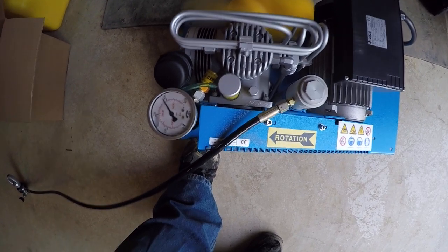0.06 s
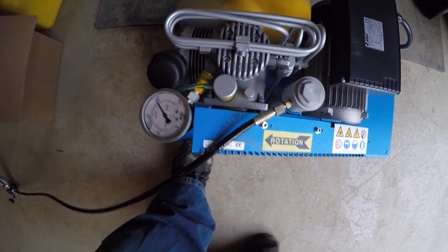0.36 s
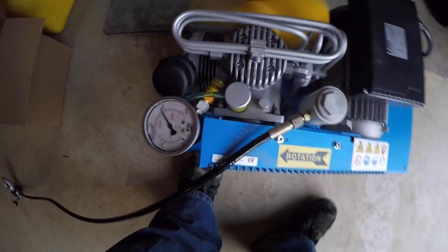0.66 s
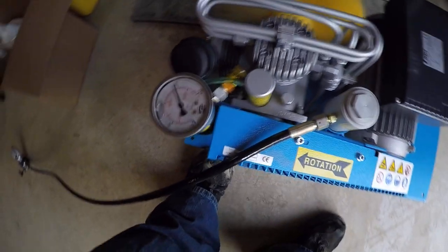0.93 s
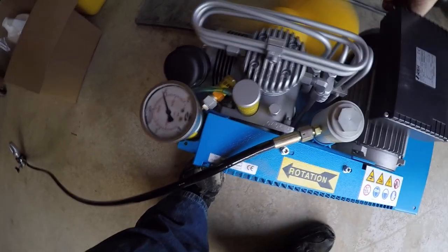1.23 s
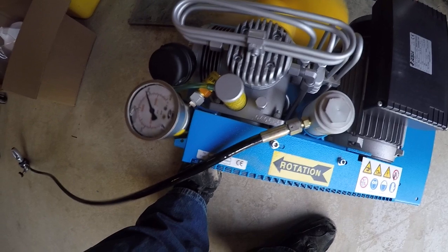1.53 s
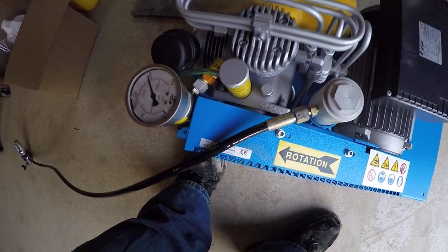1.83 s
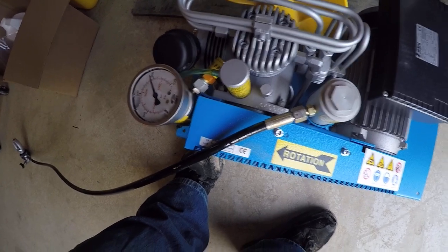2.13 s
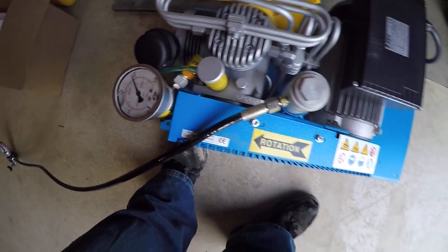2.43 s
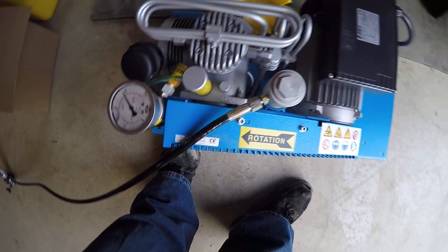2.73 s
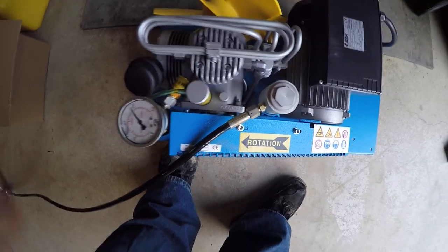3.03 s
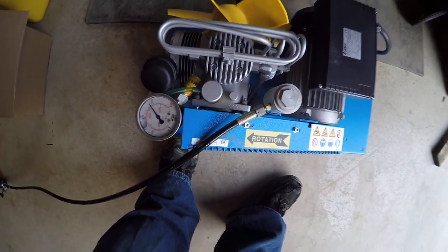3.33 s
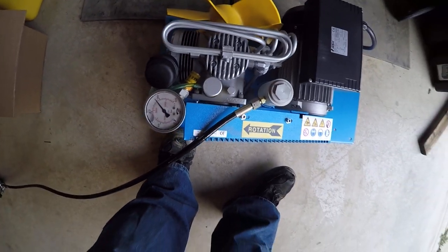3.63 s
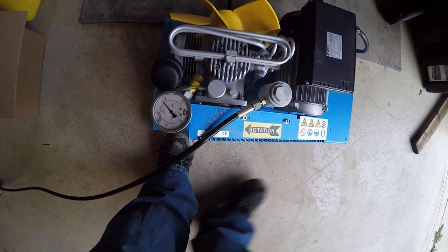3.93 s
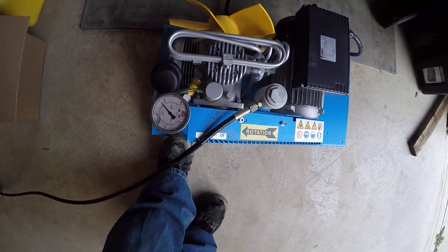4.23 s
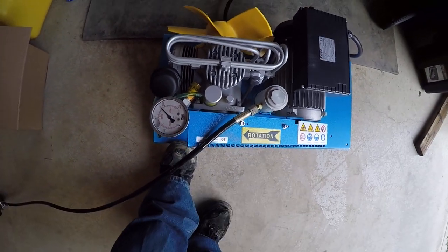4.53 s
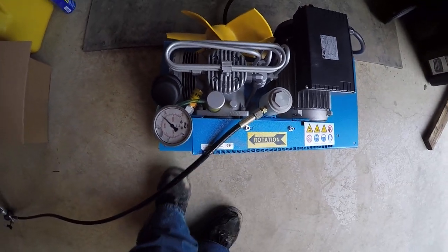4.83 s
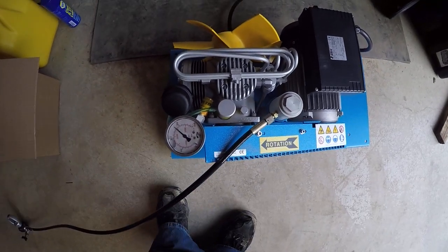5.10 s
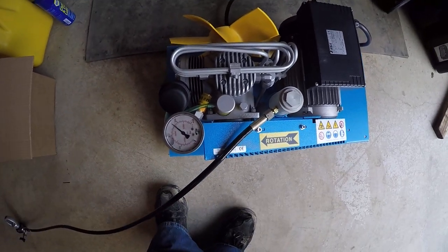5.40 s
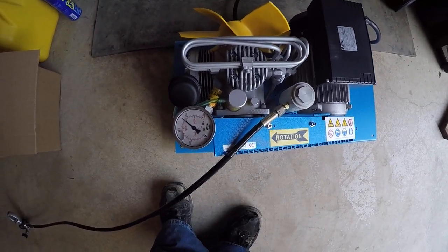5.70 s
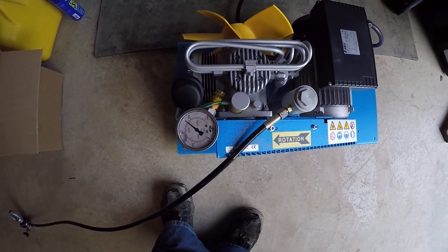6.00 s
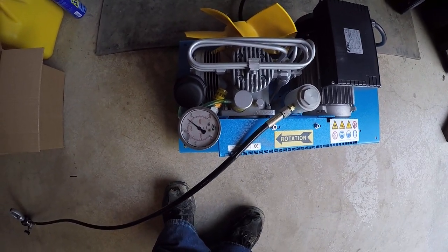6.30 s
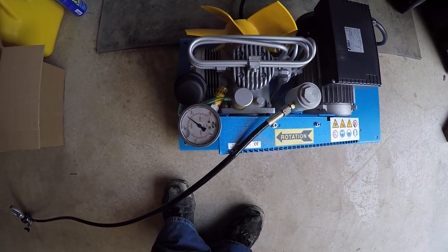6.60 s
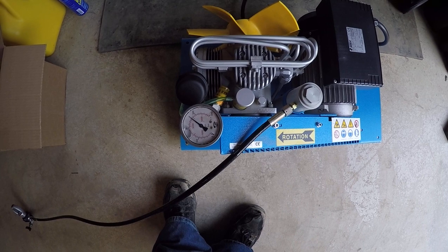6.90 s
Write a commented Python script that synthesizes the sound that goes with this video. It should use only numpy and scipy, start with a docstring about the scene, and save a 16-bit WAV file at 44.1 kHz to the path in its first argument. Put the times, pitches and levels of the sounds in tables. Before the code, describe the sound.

A piston compressor drones and chatters, then stops suddenly as escaping air hisses out with a hollow note and gradually weakens.

```python
"""A small piston compressor runs on a garage floor, heard from just above it.
At first each turn of the crank gulps air and shakes the frame, which drones and rattles, while a
little air seeps from the valve. After 1.7 seconds the motor is cut and the crank gives two last strokes.
Then the frame rings out as the drain valve opens and the stored air blows off in a long hiss.
A low rumble from the hand-held microphone rises while the air blows off, and the hiss slowly fades."""
import sys
import numpy as np
from scipy import signal
from scipy.fft import rfft, irfft
from scipy.io import wavfile
from scipy.ndimage import uniform_filter1d, map_coordinates

SR = 44100
rng = np.random.default_rng(int(sys.argv[2]) if len(sys.argv) > 2 else 0)


def master_out(mix):
    """Clip the mix to full scale and print it as 16-bit PCM to the path in sys.argv[1]."""
    frames = np.transpose(np.atleast_2d(mix))
    ceiling = np.clip(frames, -1, 1)
    pcm = np.round(ceiling * 32767).astype(np.int16)
    wavfile.write(sys.argv[1], SR, pcm)


N = 306495
TIME = np.arange(N) / SR
SLICE_S = np.arange(N // 512 + 5) * 512 / SR  # noise is shaped in short slices of time
BIN_HZ = np.fft.rfftfreq(2048, 1 / SR)  # the frequencies in each slice
CUT_S = 1.712  # the motor is cut
SINCE_CUT = np.maximum(TIME - CUT_S, 0)
DRONE_MULTIPLE = 17  # the drone's main note vibrates this many times per crank turn


# The running pump. Each row: time in seconds, drone pitch in Hz, drone and throb levels in relative dB.
RUNNING = [(0.0, 686.5, -18, -18), (0.142, 682, -18.5, -19.5), (0.884, 680.8, -19.5, -16.5),
           (1.324, 681.6, -19, -18), (1.7, 681.5, -19.5, -18)]
# The throb of the air intake. Each row: multiple of the crank speed, relative level in dB.
THROB_TONES = [(1, -4.5), (2, 2.5), (3, -11.5), (4, 2), (5, -5), (6, -11.5), (7, -18), (8, -4.5), (9, -7),
               (10, -11), (11, -18), (12, -7.5), (13, -20.5), (14, -20)]
# The drone of the frame. Each row: multiple of the crank speed, relative level in dB.
DRONE_TONES = [(15, -17.5), (16, -31), (17, -1), (18, -19), (19, -23), (20, -50), (28, -33), (32, -27.5),
               (52, -22)]
# The crank's last two strokes shake the frame again. Each row: time in seconds, relative level in dB.
LAST_STROKES = [(1.788, -1.5), (1.836, -8)]
# The noise of the fan and valves. Each row: frequency in Hz, relative level in dB.
FAN_SPECTRUM = [(11, -44), (18, -6), (64, -28), (112, -7), (163, -13), (269, -7), (318, -10), (482, -9),
                (546, -12.5), (619, -14), (687, -3.5), (811, -8), (1450, -18.5), (2070, -11.5),
                (2600, -14.5), (3380, -61), (5720, -120)]

def pump(turns):
    """The intake throbs and the frame drones over the fan's noise; the drone stumbles as it stops."""
    _, drone_db, throb_db = curves(RUNNING)
    throb = amp(throb_db + 0.7) * strokes(THROB_TONES, turns) * dying(delay_s=0.0042, t60=0.19)
    last_shakes = sum(amp(db - 2.5) * bump(s, half_s=0.015) for s, db in LAST_STROKES)
    stumble = dying(delay_s=0.036, t60=0.045) + last_shakes
    drone = amp(drone_db + 3.5) * stumble * strokes(DRONE_TONES, turns)
    puffs = 1 + 0.03 * np.cos(2 * np.pi * (turns - 0.45))
    fan = amp(-24.5) * noise(by_frequency(FAN_SPECTRUM), ripple_db=0.5)
    return throb + drone + fan * puffs * dying(delay_s=0.079, t60=0.55)


def crank():
    """Counts the crank's turns: steady under power, braked by the air pressure after the cut."""
    turns_per_s = curves(RUNNING)[0] / DRONE_MULTIPLE * np.exp(-0.3 * SINCE_CUT)
    return np.cumsum(turns_per_s) / SR + 0.0015 * wander(38)


# Each gulp sweeps down, its bass arriving last. Each row: frequency in Hz, lag in crank turns.
GULP_LAG = [(60, 0.577), (240, 0.634), (340, 0.33), (480, 0.21), (680, 0.461)]
# The room's 80 Hz standing wave swells as the microphone leans in. Each row: time in seconds, gain in dB.
ROOM_BOOM = [(0, -5), (.8, -5.5), (1.3, -1), (1.8, 0.5)]

def strokes(tones, turns):
    """Tones at multiples of the crank speed, delayed so that each turn makes one falling gulp."""
    multiples, levels_db = np.transpose(tones)
    tone_hz = multiples * RUNNING[0][1] / DRONE_MULTIPLE
    lags = np.cumsum(by_frequency(GULP_LAG, tone_hz))
    boom_db = curves(ROOM_BOOM)[0]
    gulps = np.zeros(N)
    for multiple, db, lag in zip(multiples, levels_db, lags):
        gain = amp(db + boom_db * (multiple == 2))  # this tone sits on the standing wave
        roughness = 1 + 0.062 * wander(16)
        gulps += gain * roughness * np.cos(2 * np.pi * (multiple * turns - lag))
    return unit(gulps)


# The chatter of loose parts. Each row: frequency in Hz, relative level in dB.
CHATTER_SPECTRUM = [(450, -19.5), (760, -15.5), (833, -9), (1110, -14), (1310, -15), (1420, -20),
                    (1910, -28.5), (2070, -7), (2240, -13), (2720, -18.5), (3000, -22), (3900, -54),
                    (6600, -120)]
# The cooling coil, ringing each time the pump rocks. Each row: frequency in Hz, relative level in dB.
COIL_SPECTRUM = [(1500, -56), (2000, -8), (2060, 5), (2110, 5), (2160, 11), (2800, -42)]

def rattle(turns):
    """Loose parts chatter and the coil rings as the pump rocks on its feet, about eight times a second."""
    rock_every_s = 0.1262
    rocks = np.arange(0.015, CUT_S + rock_every_s, rock_every_s)
    strength = amp(-25.5 + 1.9 * wander(7.9))
    bursts = strength * sum(bump(s, half_s=0.033) for s in rocks)
    since_knock = (turns - 0.45) % 1  # one knock in every crank turn
    knocks = unit(0.35 + np.exp(-since_knock / 0.3))
    chatter = amp(0.5) * knocks * noise(by_frequency(CHATTER_SPECTRUM), ripple_db=-3.0)
    coil = amp(-13) * noise(by_frequency(COIL_SPECTRUM), ripple_db=5.5)
    return bursts * (chatter + coil)


# The notes of the frame and coil. Each row: pitch in Hz, level in dB, seconds to fade by 60 dB.
FRAME_NOTES = [(265, -47, 6.0), (323, -35, 1.5), (560, -43, 2.0), (680, -35, 5.0), (686.5, -32, 7.5)]

def ring_out():
    """Once the motor is cut, the frame rings on at its own natural pitches."""
    ringing = np.zeros(N)
    for hz, db, t60 in FRAME_NOTES:
        phase = 2 * np.pi * hz * SINCE_CUT + 0.5 * wander(21)
        ringing += amp(db - 60 * SINCE_CUT / t60) * np.sin(phase)
    return ringing * (1 - np.exp(-SINCE_CUT / 0.026))


# The hose's hollow note, one list per colour number. Each row: frequency in Hz, relative level in dB.
HOLLOW_SPECTRA = {1: [(1050, -21), (1790, -8), (1920, 2), (1980, 3.5), (2280, 8.5), (2550, -3), (3320, -10),
                  (5610, -120)], 2: [(1050, -60), (1790, -12.5), (2150, 1.5), (2390, -3), (2550, -15),
                  (3320, -24), (5610, -120)], 3: [(1050, -29), (1790, -3), (1970, -4.5), (2100, -1),
                  (2360, -7), (2440, -15), (2550, -7), (3320, -37), (5610, -120)]}
# That note swells and sags as the valve settles.
# Each row: time in seconds, change in dB, half length in seconds.
HOLLOW_SWELLS = [(2.5, 2.7, .13), (3.03, 2, 0.15), (4.132, -1.5, 0.076), (4.42, 0.5, 0.23)]
# The rush of air in the hose. Each row: frequency in Hz, relative level in dB.
RUSH_SPECTRUM = [(260, -57), (440, -34), (495, -17.5), (544, -19.5), (622, -12), (764, -9.5), (922, -5.5),
                 (1010, -7), (1090, -4), (1210, -13.5), (1380, -5), (1430, -0.5), (1510, -3.5),
                 (1640, -3.5), (1790, -8), (2330, -49), (3940, -120)]

def drain_hose():
    """Air sputters through the hose and sounds its hollow note, which flutters more as pressure sinks."""
    flutter_hz, full_depth_db = 7.9, 0.35
    flutter_db = full_depth_db * ramp(3.6) * np.sin(2 * np.pi * flutter_hz * TIME)
    swell_db = sum(db * bump(s, half_s) for s, db, half_s in HOLLOW_SWELLS)
    hollow = blow_off("hollow") * noise(air_colour(HOLLOW_SPECTRA), ripple_db=2.5)
    hollow *= amp(flutter_db + swell_db)
    rush = blow_off("rush") * noise(by_frequency(RUSH_SPECTRUM), ripple_db=2.5)
    sputter = amp(0.5 * wander(100))
    return ramp(0.15) * (hollow + rush) * sputter


# The jet's broad body, its hiss and its high sizzle, each with one list per colour number.
# Each row: frequency in Hz, relative level in dB.
BODY_SPECTRA = {1: [(1500, -23), (2550, -2), (2820, -0.5), (2980, -4), (3400, 0.5), (3790, -7.5),
                (4410, -6), (4760, -10), (5310, -13.5), (5580, -14.5), (5900, -32), (7670, -43),
                (13000, -120)], 2: [(1500, -32.5), (2550, -11.5), (2630, -5), (2860, 2.5), (3190, -9),
                (3350, -0.5), (3480, -6), (3710, -10), (4390, -11.5), (4880, -8), (5780, -16), (5900, -27),
                (7670, -35), (13000, -120)]}
HISS_SPECTRA = {1: [(3470, -43), (5900, -6), (7030, 0.5), (8400, -7.5), (10900, -34), (18500, -120)],
                3: [(3470, -37), (5900, -25), (6010, 6.5), (6310, 5.5), (7780, -7), (8400, -6),
                (10900, -38), (18500, -120)]}
SIZZLE_SPECTRA = {0: [(4940, -18), (8400, -14), (9840, -3.5), (10200, 0.5), (11100, -6), (11900, -0.5),
                  (13200, -9), (14500, -9), (15300, -20)], 1: [(4940, -44), (8400, -11), (9360, -3.5),
                  (10200, -5), (10900, 1), (11600, 2), (12300, -0.5), (13100, -11), (14400, -7),
                  (15300, -18)], 2: [(4940, -40), (8400, -17), (8900, -6), (9500, -10.5), (10300, -0.5),
                  (11100, -6), (12900, -8.5), (14100, -10), (15300, -17)], 3: [(4940, -37), (8400, -10.5),
                  (9450, -4.5), (9790, 0), (10000, 2.5), (10400, -4), (10900, -13), (11600, -12.5),
                  (13500, -21), (13900, -9), (14600, -12), (15300, -11.5)]}
# The jet's faint low roar. Each row: frequency in Hz, relative level in dB.
ROAR_SPECTRUM = [(90, -18), (160, -4), (205, 2), (260, -5), (315, -0.5), (400, -0.5), (520, 1.5),
                 (800, -21.5)]
# The microphone moves above the machine. Each row: time in seconds, height in metres.
MIC_HEIGHT = [(0, 0.97), (1.0, 0.52), (2.0, 0.5), (2.5, 0.66), (3.0, 0.95), (4.1, 1.05), (5.2, 0.93),
              (6.95, 0.72)]

def jet():
    """High-pressure air hisses at the valve, louder as the microphone comes down towards it."""
    echo_db = cover_echo()
    body = blow_off("breadth") * noise(air_colour(BODY_SPECTRA), ripple_db=2.23)
    hiss = blow_off("hiss") * noise(air_colour(HISS_SPECTRA) + echo_db / 2, ripple_db=3.5)
    sizzle = blow_off("sizzle") * noise(air_colour(SIZZLE_SPECTRA) + echo_db, ripple_db=3.0)
    roar = blow_off("roar") * noise(by_frequency(ROAR_SPECTRUM), ripple_db=3.0)
    db_per_m, usual_height_m = 3.5, 0.78
    near_db = db_per_m * (usual_height_m - curves(MIC_HEIGHT)[0])
    return (body + hiss + sizzle + roar) * amp(near_db + 0.31 * wander(50))


# How loud each part of the escaping air is. Each row: relative levels in dB with the valve shut,
# wide open and the pressure spent, then swell time, hold time and fade time constant in seconds.
AIR_LEVELS = {"hollow": (-30.5, -18.5, -21.3, 1.17, 1.9, 4), "rush": (-31, -24.5, -27.5, 1.62, .5, 0.7),
              "breadth": (-31.5, -26.5, -31, 0.54, 2.5, 1.5), "hiss": (-39, -34, -35, 0.4, 0, 2.5),
              "sizzle": (-31.5, -25, -31.5, 0.36, 2.0, .95), "roar": (-55, -48, -53.5, 0.4, 2.5, .3)}

def blow_off(part):
    """The gain of one part of the air: it swells as the valve opens, holds, then sinks with pressure."""
    shut_db, open_db, spent_db, swell_s, hold_s, fade_s = AIR_LEVELS[part]
    spent = 1 - np.exp(-np.maximum(SINCE_CUT - swell_s - hold_s, 0) / fade_s)
    return amp(shut_db + (open_db - shut_db) * ramp(swell_s) + (spent_db - open_db) * spent)


# The air's tone colour over time. Each row: time in seconds, a colour number that picks which
# of the numbered spectra above are blended.
AIR_COLOURS = [(.5, 2), (.9, -2.3), (1.95, 1), (2.85, 1), (3.4, 2.33), (4.5, 2.5), (5.6, 2.5)]

def air_colour(spectra):
    """The air's spectrum in dB at each moment, blended from the lists nearest to its colour number."""
    number = curves(AIR_COLOURS, SLICE_S)[0]
    colour_db = 0
    for points, this_list_only in zip(spectra.values(), np.eye(len(spectra))):
        share = np.interp(number, list(spectra), this_list_only)
        octaves_below = np.log2(np.maximum(points[0][0] / (BIN_HZ + 1), 1))  # under the first row
        colour_db += share[:, None] * (by_frequency(points) - 30 * octaves_below)
    return colour_db


# An echo sweeps through the sizzle as the microphone sways. Each row: time in seconds, depth in dB.
ECHO_DEPTH = [(2.0, 0), (2.4, 2.8), (3.3, 2.8), (4.3, 1.5), (4.8, 0)]

def cover_echo():
    """The echo off the motor cover makes evenly spaced peaks and dips, in dB, that shift with the sway."""
    sway = np.interp(SLICE_S, TIME, wander(1.3))
    delay_s = 0.0013 * (1 + 0.03 * sway)
    depth_db = curves(ECHO_DEPTH, SLICE_S)[0]
    return depth_db[:, None] * np.cos(2 * np.pi * delay_s[:, None] * BIN_HZ)


# The rumble of the hand-held microphone. Each row: frequency in Hz, relative level in dB.
RUMBLE_SPECTRUM = [(16, -14), (28, 9), (48, 2), (70, -9.5), (102, 4.5), (156, -16), (175, -18), (230, -45),
                   (390, -120)]

def handling_rumble():
    """A low, uneven rumble from the hand-held microphone, rising while the air blows off."""
    early_db, late_db, from_s, rise_s = -54.5, -47, 2.14, 0.75
    risen = 1 - np.exp(-np.maximum(TIME - from_s, 0) / rise_s)
    level_db = early_db + (late_db - early_db) * risen
    return amp(level_db + 0.7 * wander(3)) * noise(by_frequency(RUMBLE_SPECTRUM), ripple_db=0.1)


def noise(shape_db, ripple_db):
    """Noise of a given colour; echoes add narrow peaks and dips that slide as the microphone moves."""
    real, imaginary, ripple = rng.standard_normal((3, len(SLICE_S), len(BIN_HZ)))
    ripple = uniform_filter1d(ripple, size=110, axis=0)  # smooth over time
    ripple = uniform_filter1d(ripple, size=3, axis=1)  # and over frequency
    slices, bins = np.indices(ripple.shape)
    stretch = 1 - 0.15 * curves(MIC_HEIGHT, SLICE_S)[0][:, None]
    ripple = map_coordinates(ripple, [slices, bins * stretch], order=1)
    gain = amp(shape_db + ripple_db * unit(ripple))
    gain /= np.linalg.norm(gain, axis=1, keepdims=True)  # same power in every slice
    _, sound = signal.istft(((real + 1j * imaginary) * gain).T, nperseg=2048, noverlap=1536)
    return unit(sound[:N])


def wander(rate_hz):
    """A smooth random wobble of typical size one, mostly slower than the given rate."""
    hz = np.fft.rfftfreq(N, 1 / SR)
    return unit(irfft(rfft(rng.standard_normal(N)) / (1 + (hz / rate_hz) ** 4), N))


def dying(delay_s, t60):
    """Full gain until a moment after the cut, then a fall of 60 dB every t60 seconds."""
    return amp(-60 * np.maximum(SINCE_CUT - delay_s, 0) / t60)


def ramp(rise_s):
    """A straight rise from zero to one, starting at the cut."""
    return np.minimum(SINCE_CUT / rise_s, 1)


def bump(at_s, half_s):
    """A smooth, brief swell of height one."""
    return np.exp(-((TIME - at_s) / half_s) ** 2)


def curves(rows, t=TIME):
    """The columns of a table, joined by straight lines in time."""
    seconds, *columns = np.transpose(rows)
    return [np.interp(t, seconds, column) for column in columns]


def by_frequency(points, hz=BIN_HZ):
    """The rows of a table, joined by straight lines along a pitch scale."""
    row_hz, values = np.transpose(points)
    return np.interp(np.log(hz + 1), np.log(row_hz + 1), values)


def amp(db):
    """Turns decibels into a gain."""
    return 10 ** (np.asarray(db) / 20)


def unit(x):
    """Scales a signal to an average power of one."""
    return x / np.sqrt(np.mean(x ** 2) + 1e-20)


def scene():
    """The compressor and its escaping air over the microphone's rumble, the same in both ears."""
    turns = crank()
    mono = pump(turns) + rattle(turns) + ring_out() + drain_hose() + jet() + handling_rumble()
    return np.array([mono, mono])


def record(dry):
    """Cuts away the very highest treble."""
    cutoff_hz = 15350
    taps = signal.firwin(1023, cutoff_hz, window=("kaiser", 9), fs=SR)
    return signal.oaconvolve(dry, taps[None], "same")


dry = scene()
out = record(dry)
master_out(out)
```